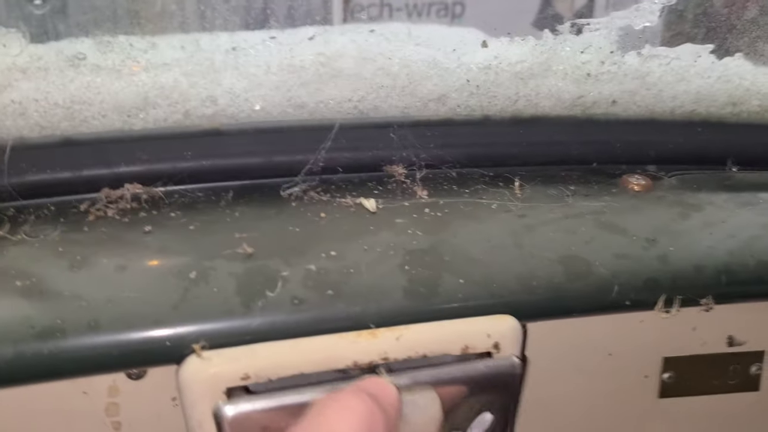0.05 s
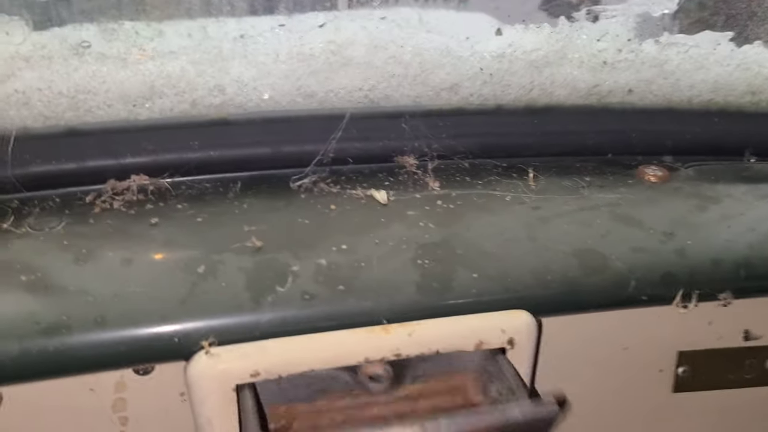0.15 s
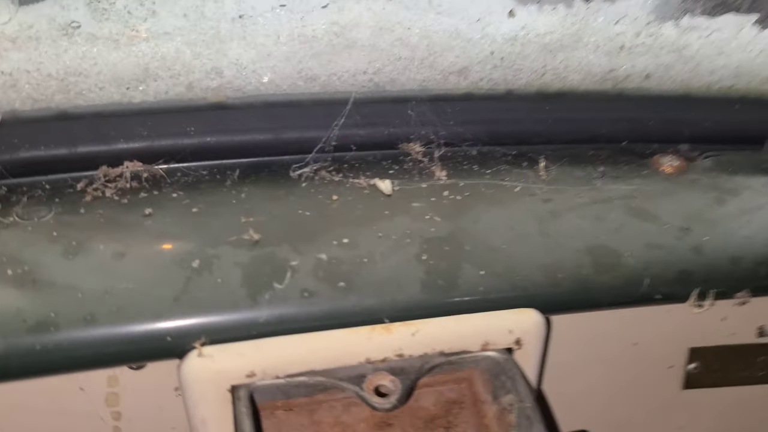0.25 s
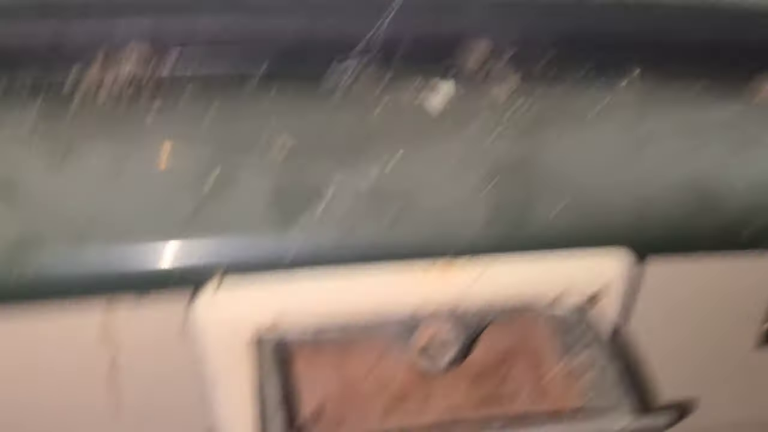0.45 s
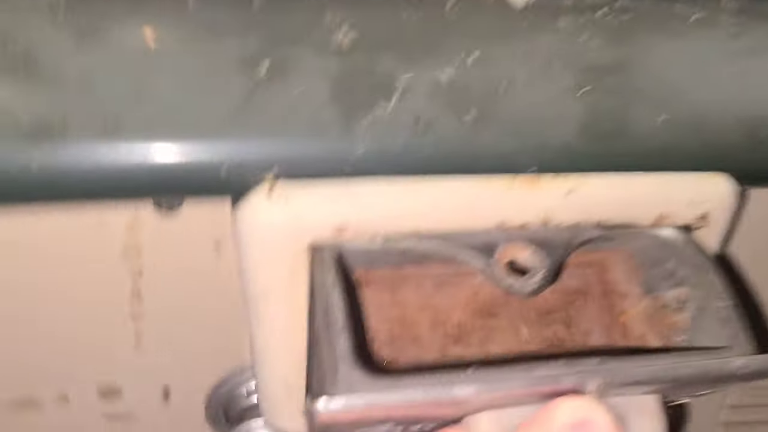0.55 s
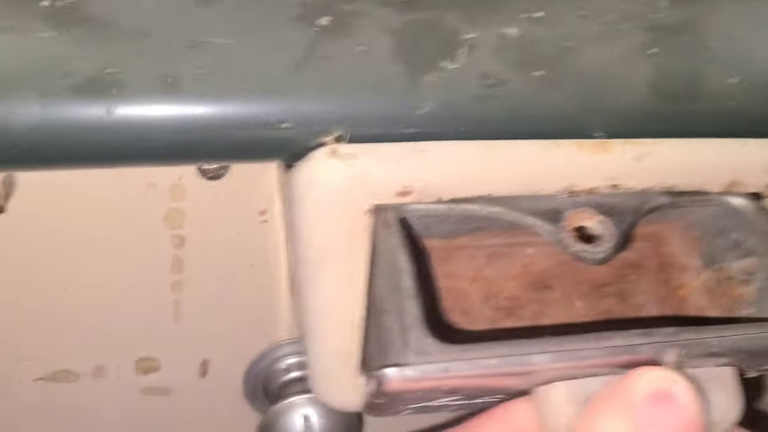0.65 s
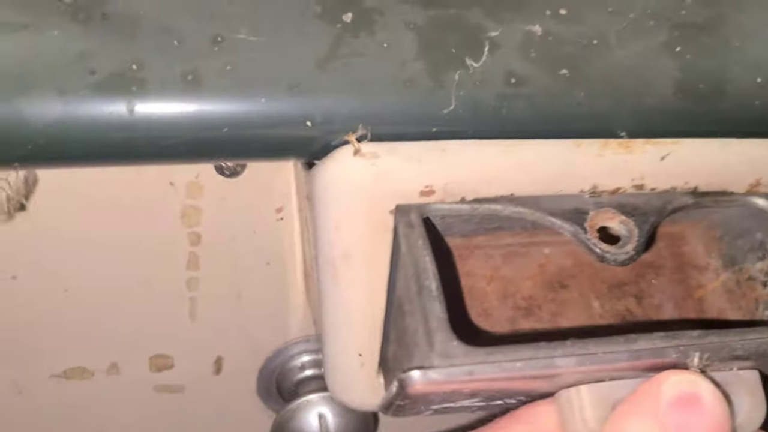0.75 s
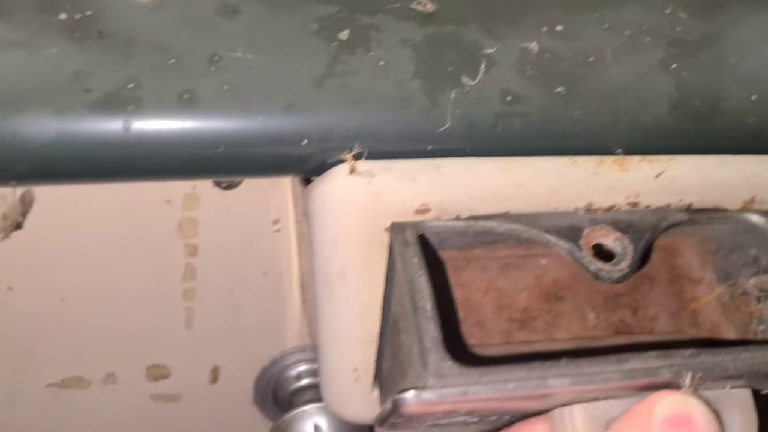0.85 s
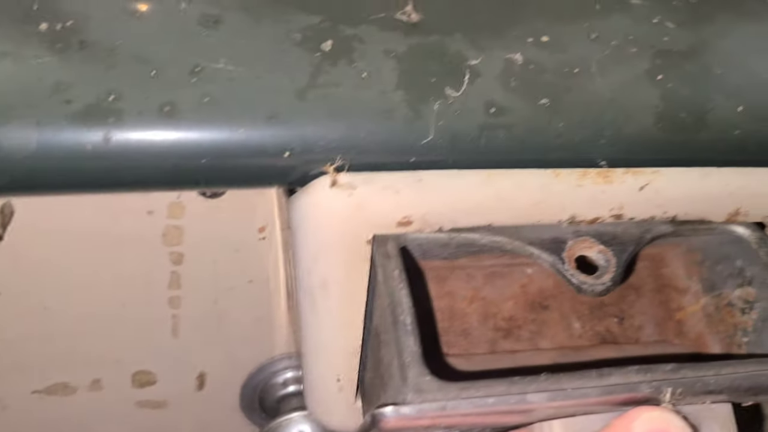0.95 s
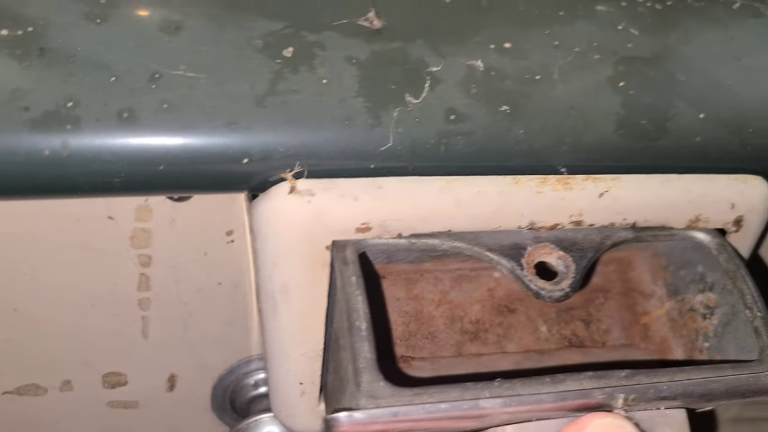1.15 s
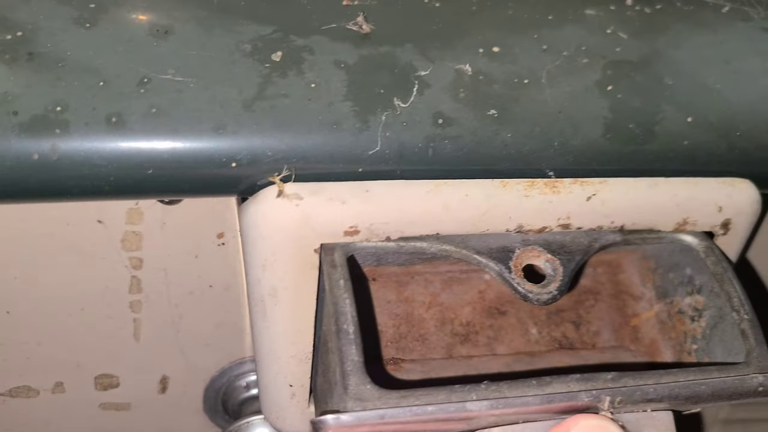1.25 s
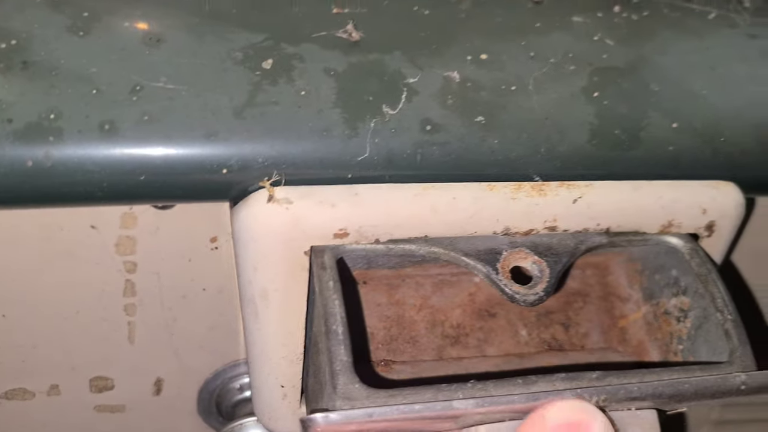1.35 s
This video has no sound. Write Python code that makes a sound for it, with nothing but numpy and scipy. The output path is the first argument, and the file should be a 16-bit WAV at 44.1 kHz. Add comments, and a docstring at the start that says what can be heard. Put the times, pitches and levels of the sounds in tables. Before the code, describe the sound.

A rusty metal tray is pulled from a dashboard, heard up close. It scrapes grittily from the start, rising into a short, rough squeak at about 0.2 seconds. Just after 0.3 seconds it clacks against its stop with a brief metallic ring and a dull thump. Two light clicks come around 0.55 and 0.65 seconds, then faint finger rustles continue until about 1.25 seconds over the cab's quiet low rumble.

```python
"""A rusty metal tray is pulled out of the dashboard of a parked vehicle, heard up close.
Rust grains snap under it in a scrape, and stick and slip makes it squeal as it judders in its guides.
It clacks against its stop; the metal rings and the dashboard booms.
Two light clicks and faint rustles of the hand follow over the low rumble of the cab."""
import sys
import numpy as np
from scipy import signal
from scipy.fft import rfft, irfft
from scipy.io import wavfile

SR = 44100
rng = np.random.default_rng(int(sys.argv[2]) if len(sys.argv) > 2 else 0)


def inscribe(sig):
    """Save sig as 16-bit PCM at rate SR to the path in sys.argv[1].

    A 1-D sig is mono; a 2-D sig holds one channel per row.
    Samples are clipped to [-1, 1] before scaling.
    """
    pcm = np.round(np.clip(np.atleast_2d(sig).T, -1, 1) * 32767)
    wavfile.write(sys.argv[1], SR, pcm.astype(np.int16))


N = 61739
T = np.arange(N) / SR
FREQS = np.fft.rfftfreq(N, 1 / SR)


def amp(db):
    """Decibels to gain."""
    return 10 ** (np.asarray(db) / 20)


def unit(x):
    """Scales to rms 1."""
    return x / np.sqrt(np.mean(x ** 2) + 1e-20)


def curve(rows, column=1):
    """One column of a table as an automation curve."""
    rows = np.array(rows)
    return np.interp(T, rows[:, 0], rows[:, column])


def fader(rows, release_db_per_s=0):
    """Gain that rides a level table, then falls at the release rate."""
    return amp(curve(rows) - release_db_per_s * np.maximum(T - rows[-1][0], 0))


def strike(start, rise, t60):
    """A quick attack and an exponential decay."""
    age = np.maximum(T - start, 0)
    return np.minimum(age / rise, 1) * amp(-60 * age / t60)


def arch(start, length):
    """A rounded swell that peaks early."""
    return np.sin(np.pi * np.clip((T - start) / length, 0, 1) ** .6)


def pan(db):
    """Stereo gains; positive dB leans left."""
    return amp([[db / 2], [-db / 2]])


def wander(hz):
    """Smooth random modulation up to about this rate."""
    return unit(irfft(rfft(rng.standard_normal(N)) / (1 + (FREQS / hz) ** 4), N))


def spectrum_at(points, hz):
    """Reads a table on a log-frequency axis."""
    f, value = np.transpose(points)
    return np.interp(np.log(hz + 1), np.log(f + 1), value)


def equalise(x, points):
    """Minimum-phase EQ with the given curve."""
    log_gain = np.log(amp(spectrum_at(points, abs(np.fft.fftfreq(4096, 1 / SR)))))
    taps = np.fft.ifft(np.exp(signal.hilbert(log_gain).conj())).real
    return signal.oaconvolve(x, taps[None], axes=1)[:, :N]


# Stereo image of the noises. Each row: frequency in Hz, left-right correlation from -1 to 1.
STEREO_IMAGE = [(80, .99), (200, .87), (750, .75), (1300, .2), (2500, -.15), (6000, 0)]
def stereo(x):
    """Blends two unrelated signals into a centred bass and a wide treble."""
    a, b = rfft(x)
    same = np.clip(spectrum_at(STEREO_IMAGE, FREQS), -1, 1)
    mid, side = a * np.sqrt((1 + same) / 2), b * np.sqrt((1 - same) / 2)
    return irfft(np.array([mid + side, mid - side]), N)


def noise(points):
    """Stereo noise through an EQ curve."""
    white = stereo(rng.standard_normal((2, N)))
    return unit(irfft(rfft(white) * amp(spectrum_at(points, FREQS)), N))


def band(hz, width_hz):
    """Stereo noise in one resonance."""
    gain = 1 / (1 + ((FREQS - hz) / width_hz) ** 2)
    return unit(irfft(rfft(rng.standard_normal((2, N))) * gain, N))


# Room tone of the cab. Each row: frequency in Hz, EQ gain in dB.
CAB_EQ = [(15, -22.5), (35, -4), (58, 3), (76, -7.5), (105, -20.5), (165, -25.5), (205, -16.5),
          (255, -29.5), (380, -22), (520, -30), (800, -30.5), (1800, -35.5), (6200, -46), (8500, -63.5),
          (16000, -53.5)]
def cab(level_db=-56):
    """The quiet cab lays a steady bed of low rumble."""
    return noise(CAB_EQ) * amp(level_db)


# Ride of the rubbing hiss. Each row: time in seconds, level in dB.
HISS_LEVEL = [(0, -61.5), (.2, -116), (.36, -61), (.45, -69), (.57, -59), (.66, -66.5), (.76, -82.5),
              (1.0, -91.5)]
# Tone of the hiss and of the click tails. Each row: frequency in Hz, EQ gain in dB.
HISS_EQ = [(200, -16), (700, 4), (1500, -4), (3100, -6), (4800, -12), (6200, -2.5), (8300, -29),
           (11000, -15.5), (15500, -7)]
def hiss():
    """Light rubbing leaves a faint hiss."""
    return noise(HISS_EQ) * fader(HISS_LEVEL)


# Strokes of the fingers. Each row: start in seconds, length in seconds, level in dB.
FINGER_STROKES = [(0.679, 0.015, -64), (0.735, 0.091, -68.5), (0.866, 0.056, -71), (1.033, 0.106, -73),
                  (1.224, 0.028, -67)]
# Their papery tone. Each row: frequency in Hz, EQ gain in dB.
RUSTLE_EQ = [(200, -15), (800, 4), (1300, -4.5), (2000, 3.5), (3200, -10), (6000, -15), (8000, -28)]
def rustles(grain_db=2.5):
    """The fingers shift on the handle in small grainy scrapes."""
    strokes = sum(amp(db) * arch(start, length) for start, length, db in FINGER_STROKES)
    return noise(RUSTLE_EQ) * unit(amp(grain_db * wander(250))) * strokes


# Ride of the handling rumble. Each row: time in seconds, level in dB.
HANDLING_LEVEL = [(0, -60.5), (.17, -47.5), (.25, -33.5), (.34, -33), (.40, -40), (.5, -48), (.62, -54),
                  (.76, -60), (.92, -85)]
# Its bass-heavy tone. Each row: frequency in Hz, EQ gain in dB.
HANDLING_EQ = [(12, -16.5), (35, -3.5), (80, 11.5), (125, -3), (200, -3), (380, -12), (520, -23.5),
               (1000, -30.5), (3000, -53)]
def handling():
    """Handling puts a swell of low rumble under the pull."""
    return noise(HANDLING_EQ) * fader(HANDLING_LEVEL)


# Light clicks. Each row: start in seconds, level in dB, snap pitch in Hz, relative snap level in dB.
CLICK_CUES = [(0.5454, -33, 14100, 8.5), (0.6279, -32, 9370, 17)]
# Hollow body of a click. Each row: pitch in Hz, relative level in dB, leftward pan in dB.
CLICK_BODY = [(787, -15, -9.5), (1820, -5, -15), (2580, -3.5, -13.5), (3700, -14, 11.5),
              (5630, -0.5, -14.5), (6790, -10.5, 20.5), (14800, -13, 7)]
def clicks(rise_s=.0001, body_t60=.0042, snap_t60=.00051, left_lag_s=.00013, tail_db=-30, tail_t60=.14):
    """Tiny dry ticks: a bright snap, a very short hollow ring and a soft tail of hiss."""
    out = np.zeros((2, N))
    for start, db, snap_hz, snap_db in CLICK_CUES:
        age = T - start - [[left_lag_s], [0]]
        body = sum(amp(level) * pan(side) * np.sin(2 * np.pi * hz * age)
                   for hz, level, side in CLICK_BODY)
        snap_tone = amp(snap_db) * pan(-10) * np.sin(2 * np.pi * snap_hz * age)
        snap = snap_tone * strike(start, rise_s, snap_t60)
        tail = amp(tail_db) * strike(start, rise_s, tail_t60) * noise(HISS_EQ)
        out += amp(db) * (body * strike(start, rise_s, body_t60) + snap + tail)
    return out


# Ride of the dashboard's drone. Each row: time in seconds, level in dB.
DRONE_LEVEL = [(.03, -72), (.08, -48.5), (.14, -43), (.17, -57), (.21, -43), (.235, -30.5), (.285, -28.5),
               (.315, -41), (.345, -66.5), (.42, -70)]
# Dull panel thumps. Each row: start in seconds, pitch in Hz, level in dB, 60 dB decay in seconds.
PANEL_THUMPS = [(0.324, 42, -40, .35), (0.304, 405.7, -34, 0.14), (.32, 202.2, -39, 0.44),
                (0.336, 338.4, -41, 0.24), (0.345, 152.8, -44, 0.35), (0.554, 227, -41, 0.12),
                (0.56, 165, -44.5, 0.11)]
def dashboard(drone_hz=96, rise_s=.011, waver=.0052):
    """The panel drones while the tray moves and booms as it stops."""
    out = fader(DRONE_LEVEL, release_db_per_s=150) * unit(np.sin(2 * np.pi * drone_hz * T))
    for start, hz, db, t60 in PANEL_THUMPS:
        pitch = hz * (1 + waver * wander(40)) * (T > start)
        boom = unit(np.sin(2 * np.pi * np.cumsum(pitch) / SR))
        out += amp(db) * strike(start, rise_s, t60) * boom
    return out


# Ride of the low grind as the tray first gives way. Each row: time in seconds, level in dB.
GRIND_LEVEL = [(.040, -71), (.046, -51), (.07, -55), (.10, -44), (.128, -40), (.168, -60.5), (.195, -42),
               (.22, -81), (.33, -66)]
# Its dull tone. Each row: frequency in Hz, EQ gain in dB.
GRIND_EQ = [(150, -14.5), (430, 0.5), (530, -7.5), (700, 9), (850, 1), (1050, -12), (1350, -10.5),
            (2400, -24), (5000, -47)]
# Accents where it catches. Each row: start in seconds, level in dB.
GRIND_CATCHES = [(0.045, -50.5), (0.193, -36)]
def grind(rise_s=.00078, catch_t60=.038):
    """Dull rubbing of the tray's broad underside, which catches twice."""
    catches = sum(amp(db) * strike(start, rise_s, catch_t60) for start, db in GRIND_CATCHES)
    return noise(GRIND_EQ) * (fader(GRIND_LEVEL, release_db_per_s=300) + catches)


# Thin chirps. Each row: start in seconds, length in seconds, pitch in Hz, level in dB,
# jitter as a share of the pitch.
THIN_CHIRPS = [(.171, 0.031, 6540, -51, 0), (0.1992, 0.0079, 4300, -30, 0),
               (.204, 0.028, 4260, -35.5, 0.01), (0.40, 0.095, 3104, -67.5, 0.04)]
def chirps(rasp=.37, third_harmonic_db=-22):
    """The rust catches and gives brief, rasping high notes; a thin, faint squeak lingers after the stop."""
    out = np.zeros((2, N))
    for start, length, hz, db, jitter in THIN_CHIRPS:
        pitch = hz * (1 + jitter * np.array([wander(900), wander(900)]))
        phase = 2 * np.pi * np.cumsum(pitch, 1) / SR
        tone = np.sin(phase) + amp(third_harmonic_db) * np.sin(3 * phase)
        out += amp(db) * arch(start, length) * unit(tone * (1 + rasp * wander(700)))
    return out


# Metal ring of the tray. Each row: pitch in Hz, relative level in dB, 60 dB decay in seconds.
TRAY_MODES = [(613, -7.5, .25), (670.5, -2.5, 0.13), (784, 5, 0.063), (845, 4, 0.07), (1154, 1.5, 0.13),
              (1355.3, 5.5, 0.052), (1575, -6.5, 0.089), (1790, -10, 0.046), (1988, -8.5, 0.1),
              (2342, -12, .1), (3203, -4.5, 0.072), (3865, -8, .07), (4290, -6.5, .08), (6120, -10.5, 0.08)]
def tray_ring(force):
    """The tray's modes answer a force; left and right differ more in phase toward the treble."""
    t = T[:SR // 3]
    response = np.zeros((2, len(t)))
    for hz, db, t60 in TRAY_MODES:
        phase = rng.uniform(-.9, .9, (2, 1)) * (hz / 1200) ** 2
        response += amp(db - 60 * t / t60) * np.sin(2 * np.pi * hz * t + phase)
    return signal.oaconvolve(force, unit(response) / np.sqrt(len(t)), axes=1)[:, :N]


def judder(rate_hz=94, drift_depth=.05, crest_s=.2375):
    """Phase of the tray's slightly uneven shudder in its guides."""
    drift = np.cumsum(drift_depth * wander(50)) / SR
    return 2 * np.pi * rate_hz * (T - crest_s + drift - np.interp(crest_s, T, drift))


# Ride of the friction in the guides. Each row: time in seconds, level in dB.
SCRAPE_LEVEL = [(.04, -70.5), (.052, -48.5), (.10, -51), (.128, -50), (.165, -48.5), (.195, -43.5),
                (.225, -36), (.245, -34.5), (.30, -33), (.328, -36.5), (.36, -65.5), (.40, -65)]
# Its gritty tone. Each row: frequency in Hz, EQ gain in dB.
SCRAPE_EQ = [(100, -4), (350, -16), (520, -10), (720, -5.5), (1000, -7), (1900, 5.5), (2600, -5),
             (3900, -3), (5200, -14.5), (6500, -12.5), (7800, -46.5), (10000, -23), (15500, -20)]
def scrape(judder_phase, grain_db=3, grains_per_s=3000, pulsing=.1, smooth_mix=.3):
    """Rust grains snap under the sliding tray, pulsing with the judder."""
    sizes = amp(grain_db * np.minimum(rng.exponential(1, (2, N)), 4))
    grains = sizes * rng.choice([-1, 1], (2, N)) * (rng.random((2, N)) < grains_per_s / SR)
    crackle = unit(equalise(stereo(grains), SCRAPE_EQ))
    grit = unit(crackle + smooth_mix * noise(SCRAPE_EQ))
    return grit * fader(SCRAPE_LEVEL, release_db_per_s=82) * (1 + pulsing * np.cos(judder_phase))


# Hits of the tray; the loudest is its stop. Each row: start in seconds, level in dB,
# 60 dB decay in seconds, pitch of the struck edge in Hz, relative edge level in dB.
TRAY_KNOCKS = [(0.052, -51, 0.06, 4300, -1), (0.1965, -37, 0.17, 3650, 0), (0.269, -34, 0.12, 3900, -5),
               (0.3117, -21, 0.1, 3900, -11.5), (0.3195, -31.5, 0.065, 4400, -5.5)]
# Tone of their crunch. Each row: frequency in Hz, EQ gain in dB.
KNOCK_EQ = [(100, -12.5), (400, -8), (800, -6), (1500, 5), (2400, 3.5), (4200, -2), (5200, -2.5),
            (6600, -3.5), (8500, -23.5), (11000, -15.5), (15500, -14.5)]
def knocks(rattle_db=.8, rise_s=.0013, lead_in_db=-11, lead_in_s=.004, edge_width_hz=260):
    """The tray grates harder just before each hit, then crunches as the struck edge rings."""
    crunch = noise(KNOCK_EQ) * amp(rattle_db * wander(600))
    out = np.zeros((2, N))
    for start, db, t60, edge_hz, edge_db in TRAY_KNOCKS:
        blow = strike(start, rise_s, t60)
        lead_in = amp(lead_in_db) * np.exp(-abs(T - start) / lead_in_s)
        edge = amp(edge_db) * band(edge_hz, edge_width_hz)
        out += amp(db) * (crunch * (blow + lead_in) + edge * blow)
    return out


# Contour of the squeal. Each row: time in seconds, pitch in Hz, level in dB.
SQUEAL_CONTOUR = [(.205, 1330, -52), (.228, 1320, -33), (.234, 1330, -19.5), (.268, 1340, -18),
                  (.274, 1270, -17.5), (.284, 1200, -17.5), (.2955, 1260, -12.5), (.300, 1260, -20),
                  (.307, 1290, -22.5), (.314, 1210, -20.5), (.322, 1165, -14), (.326, 1230, -24),
                  (.345, 1190, -50)]
# Its rough side notes. Each row: pitch in Hz, relative level in dB, jitter as a share of the pitch.
SQUEAL_SIDE_NOTES = [(790, -20, .05), (1185, -10.5, .025), (1790, -17.5, .028), (1960, -17, .028)]
# Dropouts where the tray snags. Each row: time in seconds, share of the note lost from 0 to 1.
SQUEAL_SNAGS = [(.245, .6), (.252, .45), (.2725, .95), (.278, .85), (.2988, .85), (.317, .7), (.3247, .85)]
def squeal(judder_phase, vibrato=.015, tremolo=.14, shimmer=.082, snag_s=.0013, left_lead_s=.00019):
    """Stick and slip sings one rough note; the judder bends it and snags break it up."""
    hz = curve(SQUEAL_CONTOUR) * (1 + vibrato * np.sin(judder_phase) + .018 * wander(250))
    phase = 2 * np.pi * (np.cumsum(hz) / SR + hz * np.array([[left_lead_s], [0]]))
    tone = np.sin(phase) + amp(-31) * np.sin(2 * phase) + amp(-35) * np.sin(3 * phase)
    for note_hz, db, jitter in SQUEAL_SIDE_NOTES:
        side_hz = note_hz * (1 + jitter * np.array([wander(300), wander(300)]))
        tone += amp(db) * np.sin(2 * np.pi * np.cumsum(side_hz, 1) / SR)
    chop = 1 + tremolo * np.cos(judder_phase)
    flicker = 1 + shimmer * np.array([wander(250), wander(250)])
    dropouts = 1 - sum(share * np.exp(-((T - at) / snag_s) ** 2) for at, share in SQUEAL_SNAGS)
    gate = (T > SQUEAL_CONTOUR[0][0]) & (T < SQUEAL_CONTOUR[-1][0])
    level = amp(curve(SQUEAL_CONTOUR, column=2)) * gate
    return unit(tone) * chop * flicker * dropouts * level * pan(-3)


def scene(scrape_send_db=-3, squeal_send_db=-30, knock_send_db=-7):
    """Scrape, squeal and knocks feed the tray's ring, up front over the dashboard and the cab."""
    judder_phase = judder()
    rub, note, hits = scrape(judder_phase), squeal(judder_phase), knocks()
    force = amp(scrape_send_db) * rub + amp(squeal_send_db) * note + amp(knock_send_db) * hits
    tray = rub + note + hits + tray_ring(force) + chirps() + grind()
    background = hiss() + cab()
    return background + dashboard() + handling() + clicks() + rustles() + tray


def record(dry, cutoff_hz=16100):
    """A steep low-pass trims the very top of the mix."""
    lowpass = signal.firwin(511, cutoff_hz, window=("kaiser", 9), fs=SR)
    return signal.oaconvolve(dry, lowpass[None], "same")


dry = scene()
out = record(dry)
inscribe(out)
```